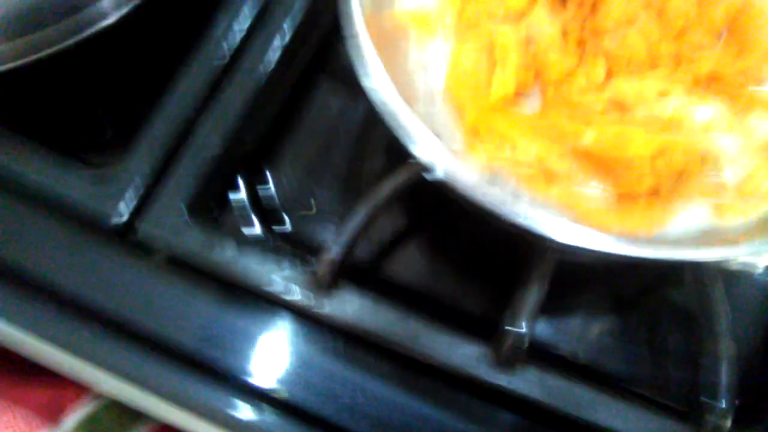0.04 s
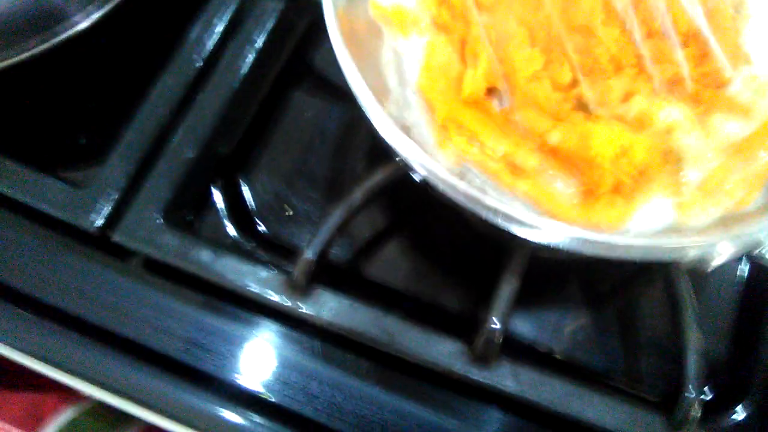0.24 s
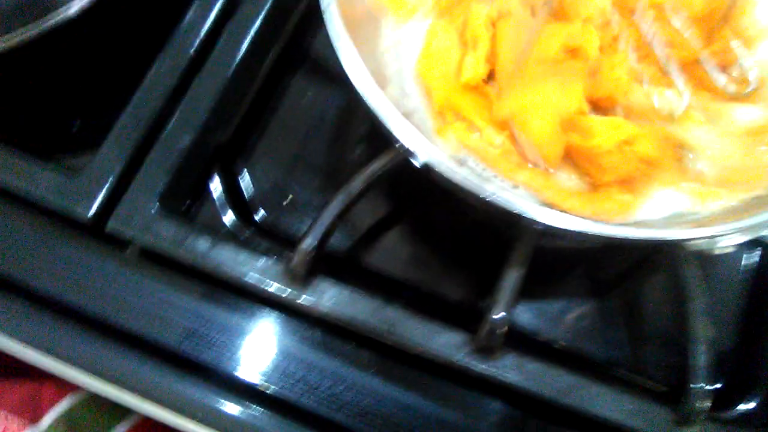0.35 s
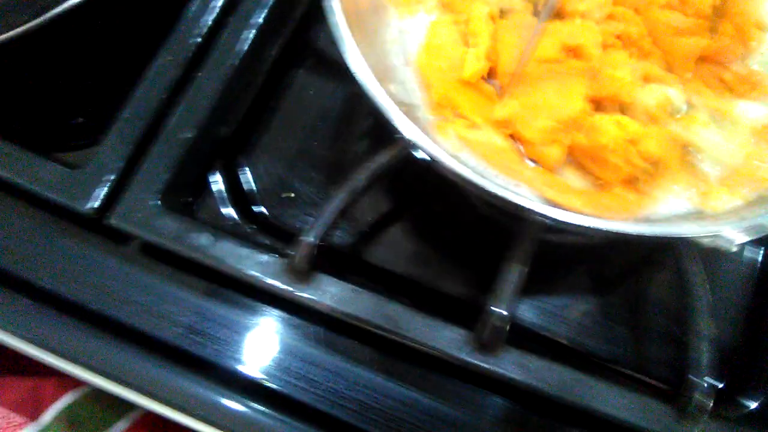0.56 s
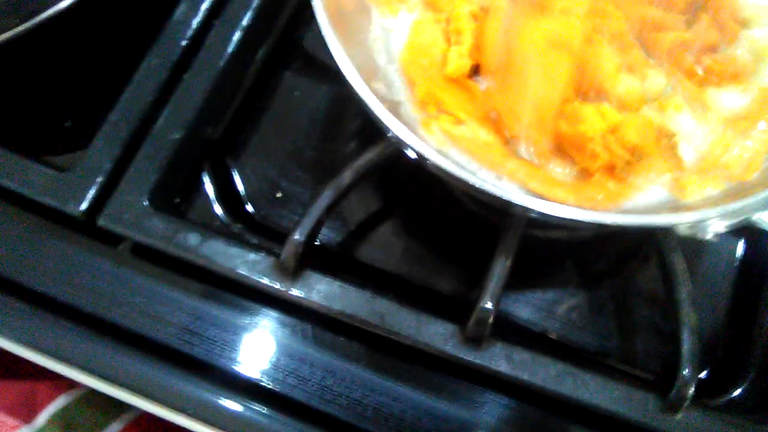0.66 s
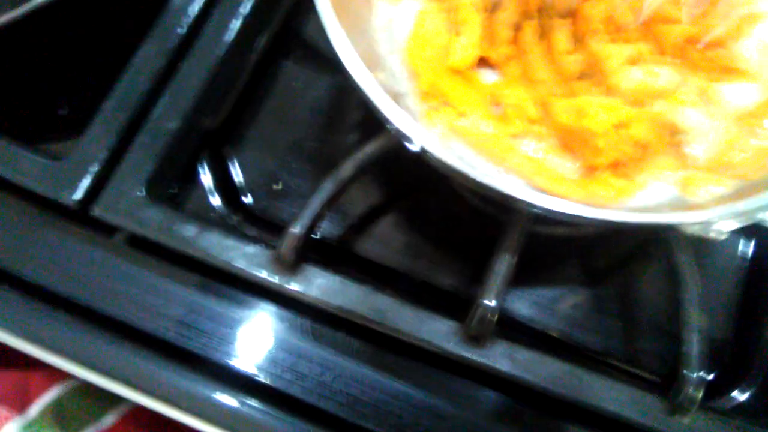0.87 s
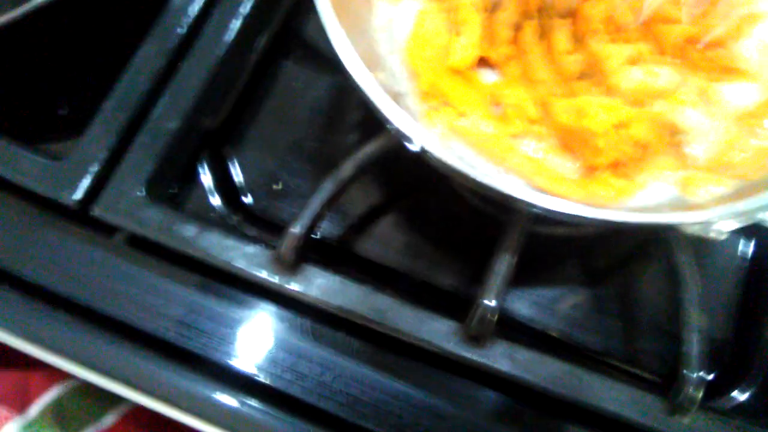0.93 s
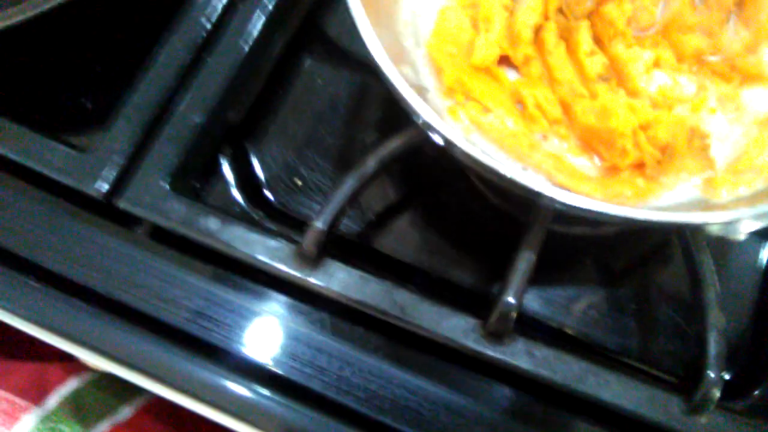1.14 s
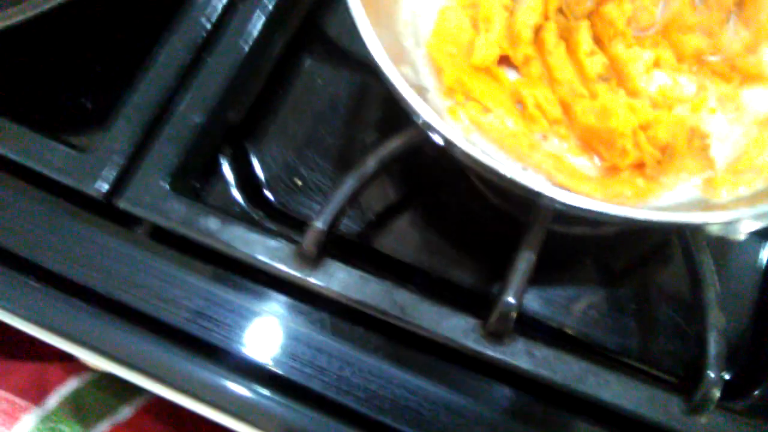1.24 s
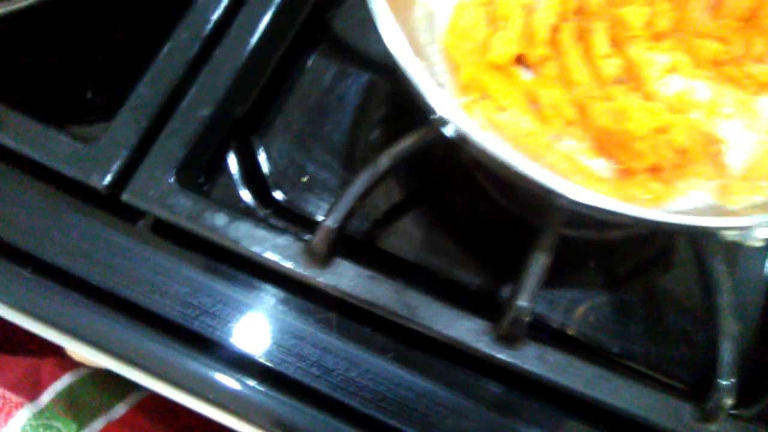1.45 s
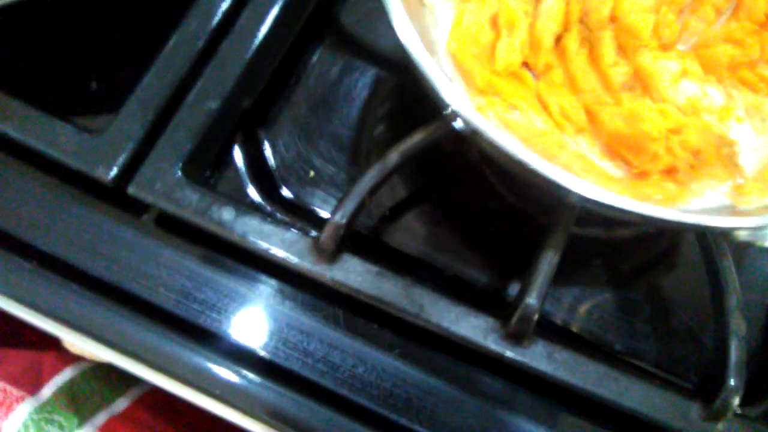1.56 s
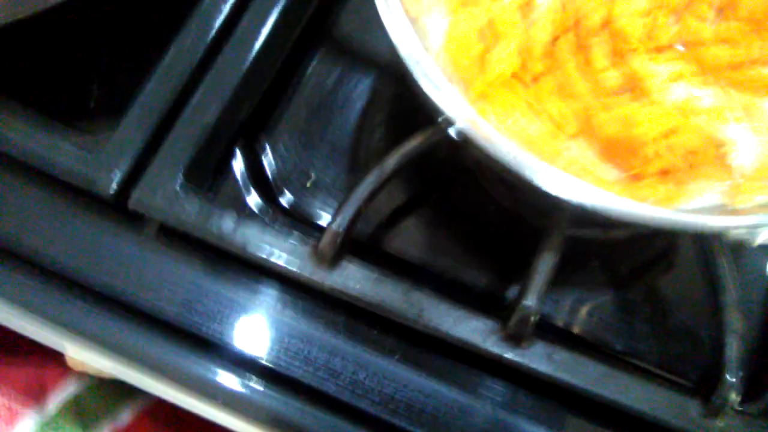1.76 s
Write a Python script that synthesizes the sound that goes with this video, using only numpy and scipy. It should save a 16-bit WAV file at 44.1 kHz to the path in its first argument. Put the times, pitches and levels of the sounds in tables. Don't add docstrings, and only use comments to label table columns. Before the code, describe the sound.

A masher knocks a metal pan full of soft mash on a stove grate, close up. Light ticks and sticky smacks open; hard clattering blows hit at 0.25-0.45 s, with low stove boom and handling jolts. Small ticks and weak knocks follow, wet smacks near 1.2 s, another clank pair at 1.27-1.3 s, then lighter knocks at 1.4, 1.55 and 1.67 s. Short kitchen tail, faint rumble.

```python
import sys
import numpy as np
from scipy import signal
from scipy.fft import rfft, irfft, next_fast_len
from scipy.io import wavfile
from scipy.ndimage import uniform_filter1d

SR = 44100
rng = np.random.default_rng(int(sys.argv[2]) if len(sys.argv) > 2 else 0)


def generate_wav(signal):
    frames = np.transpose(np.atleast_2d(signal))
    scaled = np.clip(frames, -1, 1) * 32767
    pcm = np.round(scaled).astype(np.int16)
    wavfile.write(sys.argv[1], SR, pcm)


def voltage_ratio(level):
    return 10 ** (np.asarray(level, float) / 20)


N = 79380


def curve(points, hz):
    p = np.array(points, float)
    return np.interp(np.log(np.maximum(hz, 1)), np.log(p[:, 0]), p[:, 1])


def colour(x, points, power=1):
    size = next_fast_len(x.shape[-1])
    hz = np.arange(size // 2 + 1) * SR / size
    return irfft(rfft(x, size) * voltage_ratio(power * curve(points, hz)), size)[..., :x.shape[-1]]


def ring(x, hz, t60):
    turn_and_fade = np.exp((2j * np.pi * hz - np.log(1000) / t60) / SR)
    return signal.lfilter([1], [1, -turn_and_fade], x + 0j)


def spikes(times, sizes):
    places = np.clip((np.asarray(times) * SR).astype(int), 0, N - 1)
    return np.bincount(places, sizes, N)


def walk(count):
    k = int(SR / count)
    steps = np.repeat(rng.standard_normal(N // k + 1), k)
    return 1.3 * uniform_filter1d(uniform_filter1d(steps, k), k)[:N]


def ports(z, hz):
    turn = rng.choice([-1, 1]) * min(hz / 2500, 1.6)
    return np.imag(z * np.exp(.5j * turn * np.array([[1], [-1]])))


def random_hits(times, levels_db, scatter_db):
    luck = rng.standard_normal((len(times), 2))
    sizes = voltage_ratio(levels_db + scatter_db * np.tanh(luck[:, 0]))
    return spikes(times, sizes * np.sign(luck[:, 1]))


def bursts(rows, edges_db, t60, peak_db, width, alike, under_hz):
    # (pitch [Hz], level [dB])
    crack_colour = [(240, -46.5), (400, 0), (742, -35), (1870, -11), (2430, -10), (3530, -10),
                    (4500, -10.5), (6440, -7), (13700, -29), (16000, -38.5)]
    rise_s, edge_hz, soft_edge_hz = .0007, 7000, 8400
    out, t = np.zeros((2, N + 4096)), np.arange(4096) / SR
    fade = voltage_ratio(-60 * t / t60) * np.minimum(t / rise_s, 1) ** 2
    for row, edge_db in zip(rows, edges_db):
        mid, side = rng.standard_normal((2, 4096)) * fade
        x = mid + (1 - alike) * side * np.array([[1], [-1]])
        peak = signal.lfilter(*signal.iirpeak(row[2], 1 / width, SR), x)
        x = colour(x, crack_colour) + voltage_ratio(peak_db) * peak
        x = colour(x, [(.5 * under_hz, -25), (under_hz, 0), (edge_hz, 0), (soft_edge_hz, edge_db)])
        i = int(row[0] * SR)
        out[:, i:i + 4096] += x * voltage_ratio(row[1]) / np.abs(x.mean(axis=0)).max()
    return out[:, :N]


def hum():
    # (pitch [Hz], level [dB])
    hum_colour = [(15, -19.5), (25, 26.5), (180, 7), (1290, -11), (2280, -20), (6050, -27), (14100, -30.5),
                  (14700, -64)]
    mid, side = colour(rng.standard_normal((2, N)), hum_colour)
    x = (mid + 0.26 * side * np.array([[1], [-1]])) * voltage_ratio(2 * walk(count=8))
    return x * voltage_ratio(-51) / x.std()


def room(x):
    # (pitch [Hz], t60 [s])
    room_t60 = [(200, 1), (1000, 0.24), (3000, 0.27), (8000, 0.14), (15000, 0.12)]
    t, tail = np.arange(SR // 2) / SR, 0
    for hz in 125 * 2. ** np.arange(8):
        band = signal.butter(2, [hz / 1.41, min(hz * 1.41, 20000)], "band", fs=SR, output="sos")
        noise = signal.sosfilt(band, rng.standard_normal((2, len(t))))
        tail = tail + noise * voltage_ratio(-60 * t / curve(room_t60, hz))
    tail = tail * np.minimum(t / 0.0021, 1)
    tail = tail / np.sqrt((tail ** 2).sum(axis=1).mean())
    return signal.fftconvolve(x.mean(axis=0)[None], tail)[:, :N]


def jolts():
    # (time [s], level [dB], wobble [Hz])
    hand_jolts = [
        (0, -38.5, 46.4),
        (0.256, -25, 32.7),
        (0.432, -28.5, 30.24),
        (.99, -38.5, 48.3),
        (1.289, -40.5, 52),
    ]
    out = 0
    for s, db, hz in hand_jolts:
        out = out + np.imag(ring(spikes([s], [voltage_ratio(db)]), hz, 0.45)) * voltage_ratio(2.5 * walk(count=15))
    return uniform_filter1d(out, size=301)


def smacks():
    # (time [s], peak level [dB], colour [Hz])
    mash = [(.0134, -35, 5600), (.0850, -20.5, 6570), (.0440, -26, 5300), (.1218, -34, 5400),
            (.6195, -37.5, 6500), (.6245, -31.5, 7870), (.6295, -26, 6600), (.6340, -42, 7240),
            (.6425, -24, 5580), (.9780, -36, 6500), (1.0973, -40, 6300), (1.1010, -43.5, 7020),
            (1.1450, -40.5, 6300), (1.1580, -42, 6500), (1.1875, -18.5, 6470), (1.2017, -18.5, 6700),
            (1.5172, -41, 8700), (1.5395, -33, 4550), (1.6194, -34, 6060), (1.7651, -30.5, 9050),
            (.9545, -53, 7500), (.9622, -23.5, 6300), (.9967, -25, 6230), (1.1290, -51, 8000),
            (1.1750, -45, 4800), (1.4780, -32, 5050), (1.4825, -43, 7500), (1.4925, -34.5, 5900),
            (1.5025, -51, 7040), (1.5805, -48, 9000), (1.7267, -31, 4900), (1.7770, -42, 6000),
            (1.7846, -37, 5500), (1.7985, -26, 8140)]
    return bursts(mash, np.full(len(mash), -4.), t60=.009, peak_db=24.0, width=0.26, alike=0.28,
                  under_hz=3704)


def grate():
    # (time [s], peak level [dB], pitch [Hz])
    ticks = [(0.0436, -14, 2603), (0.2272, -36.5, 2560), (0.2886, -11, 1880), (.2940, -9, 2500),
             (.3010, -18, 2670), (.3770, -16.5, 1790), (.0880, -28, 3000), (.5460, -22, 3750),
             (0.6558, -16.5, 2950), (1.3135, -14.5, 2370), (.4115, -26, 2410), (0.6279, -22.5, 2560),
             (0.7093, -24, 2250), (.7836, -25, 2280), (.8425, -31, 2170), (0.8868, -40, 2000),
             (1.1742, -18.5, 2370), (1.1954, -29, 1950), (1.3884, -26, 2280), (1.7267, -20.5, 2410)]
    t60_s, rise_s, glide = .012, .0015, .16
    out, t = np.zeros((2, N + 2048)), np.arange(2048) / SR
    bend = 2 * np.pi * np.cumsum(1 + glide * (np.minimum(t / 0.0028, 1) - .5)) / SR
    rise = np.sin(np.minimum(t / rise_s, 1) * np.pi / 2) ** 2
    for s, db, hz in ticks:
        chirp = np.exp(1j * hz * bend) + voltage_ratio(-19.5) * np.exp(1.7j * hz * bend)
        i = int(s * SR)
        out[:, i:i + 2048] += ports(chirp * voltage_ratio(db - 60 * t / t60_s) * rise, hz)
    k = np.array(ticks)
    hits = uniform_filter1d(spikes(k[:, 0] + 0.00091, voltage_ratio(k[:, 1])), size=9) * 8
    bars = 0
    for hz, db, t60 in [(2020, -46, 0.2), (2370, -45.5, 0.096)]:
        bars = bars + voltage_ratio(db) * ports(ring(hits, hz, t60) * np.exp(.7j * walk(count=50)), hz)
    return (out[:, :N] + bars) * voltage_ratio(np.array([[1], [-1]]))


def stove(rattle):
    # (time [s], level [dB], where it booms [Hz])
    thuds = [(0.010, -31.5, 120), (0.047, -30.5, 161), (.248, -18.5, 222), (0.287, -20.5, 198),
             (0.323, -37.5, 280), (.429, -25.5, 180), (0.506, -37.5, 162), (.545, -31, 246),
             (.60, -36.5, 151), (0.656, -37.5, 200), (0.714, -35, 178), (0.786, -44, 170),
             (0.859, -48, 190), (0.965, -34, 300), (0.995, -39.5, 280), (1.177, -37.5, 150),
             (1.269, -28.5, 302), (1.299, -28.5, 200), (1.407, -36.5, 180), (1.474, -36, 174),
             (1.55, -30, 300), (1.667, -37, 180), (1.728, -34.5, 165)]
    # (pitch [Hz], level [dB], t60 [s])
    body_notes = [(87.5, -8, 0.17), (108.6, -10, .22), (166.5, -3.5, 0.28), (191.5, -8.5, 0.21),
                  (256.5, -9, 0.18), (292.5, -4, 0.16), (330, -10, 0.22), (404.4, -16.5, 0.29),
                  (489, -14, 0.2), (726, -21.5, 0.19)]
    wobble, reach_oct, rattle_db = .95, 0.9, -30
    k, out = np.array(thuds), 0
    for hz, db, t60 in body_notes:
        near_db = -6 * (np.log2(hz / k[:, 2]) / reach_oct) ** 2
        hits = random_hits(k[:, 0], k[:, 1] + near_db, scatter_db=1.3)
        waver = np.exp(wobble * (0.098 * walk(count=30) + 1j * walk(count=30)))
        out = out + voltage_ratio(db) * ports(ring(hits + voltage_ratio(rattle_db) * rattle, hz, t60) * waver, hz)
    return uniform_filter1d(out, size=31)


def chatter():
    starts = [0, .251, .290, .432, .628, .965, 1.177, 1.275, 1.300, 1.405, 1.549, 1.730]
    # (length [s], level [dB], level change by the end [dB])
    spells = [(.13, -50.5, -4), (0.034, -23, -1), (0.17, -20, -30), (0.2, -35.5, -28.5), (0.16, -43, -24.5),
              (0.058, -38.5, -26), (0.043, -43.5, -10), (0.045, -27.5, -8.5), (0.089, -29.5, -19.5),
              (0.45, -49.5, -45), (0.23, -50, -30), (0.06, -48.5, -13.5)]
    per_s, spread_db = 2500, 2.6
    t, gain = np.arange(N) / SR, np.zeros(N)
    for start, (length, db, fade_db) in zip(starts, spells):
        u = (t - start) / length
        gain += voltage_ratio(db + fade_db * np.clip(u, 0, 1)) * (u >= 0) * (u < 1)
    chance = rng.random((3, N))
    knock = (chance[0] < per_s / SR) * np.sign(chance[1] - .5)
    size = voltage_ratio(spread_db * np.minimum(-np.log(chance[2]), 5))
    return gain * knock * size * 4


def free_pan():
    # (time [s], level [dB])
    lifts = [
        (.0442, -47.5),
        (1.1745, -51.5),
        (1.726, -51.5),
    ]
    # (pitch [Hz], level [dB], t60 [s])
    free_notes = [(802, -1, .8), (5100, 13, .08), (6200, 6, .06)]
    k, out = np.array(lifts), 0
    hits = spikes(k[:, 0], voltage_ratio(k[:, 1]))
    for hz, db, t60 in free_notes:
        note = ports(ring(hits, hz, t60) * np.exp(.7j * walk(count=40)), hz)
        out = out + voltage_ratio(db) * note * voltage_ratio(1.9 * walk(count=30))
    return out


def notes():
    # (time [s], level [dB], pitch [Hz], t60 [s])
    left_singing = [(.4283, -17, 1260, 0.032), (.4360, -24.5, 1865, 0.078), (.6553, -34, 1640, 0.11),
                    (.6556, -37, 4700, 0.072), (.6556, -39.5, 5940, .11), (.7225, -39, 1665, 0.065),
                    (.9680, -40.5, 1720, .14), (1.4051, -39, 1820, 0.063), (1.4051, -39, 3040, 0.11),
                    (1.6650, -38.5, 1865, 0.11), (1.2984, -22, 1122, 0.035), (1.5456, -19, 5360, 0.021),
                    (1.544, -25.5, 1062, 0.027)]
    out = 0
    for s, db, hz, t60 in left_singing:
        note = ring(spikes([s], [voltage_ratio(db)]), hz, min(t60, .13))
        out = out + ports(note * np.exp(1.1j * walk(count=150)), hz / 3)
    return out


def pan(rattle):
    # (time [s], peak level [dB], colour [Hz], bright edge [dB])
    blows = [(0.2468, -2.5, 1754, -1), (0.2492, -11.5, 3900, 5), (0.2579, -20, 2650, -10),
             (0.282, -11, 6560, 0), (0.3289, -12.5, 6100, -12), (0.336, -14.5, 5800, -9),
             (0.4433, -14, 1870, -23), (0.2882, -10.5, 2080, -2.5), (0.2999, -8, 3000, -11),
             (0.3218, -8, 5940, -2.5), (0.3585, -18, 6000, -19), (0.4284, -6, 3060, 4.5),
             (0.4278, -8, 1375, -3), (0.4353, -12, 1800, -14.5), (0.5456, -31, 3740, -25),
             (0.6553, -23, 1490, -38.5), (0.722, -40.5, 1614, -52), (0.9620, -27, 4350, -15),
             (0.967, -26.5, 1660, -12.5), (0.9974, -27.5, 2860, 5), (1.2678, -10.5, 1930, 6),
             (1.2721, -8, 4850, -5), (1.2973, -9, 1070, -1), (1.3285, -20.5, 6400, -9),
             (1.4039, -25.5, 1790, -13), (1.4675, -27.5, 3900, -10.5), (1.5453, -15, 4610, 3.5),
             (1.6652, -20.5, 1910, -7.5)]
    # (pitch [Hz], level [dB], t60 [s])
    pan_notes = [(953.4, -3, 0.045), (1172, -2.5, 0.04), (1803, 1.5, 0.015), (2146, -14.5, 0.077),
                 (2855, -10, 0.13), (3000, -8, 0.077), (3333, -5.5, 0.058), (4170, -18, 0.041),
                 (5220, 0.5, 0.05), (6020, -2, 0.1), (6500, -11, .07)]
    # (pitch [Hz], level [dB])
    scrape_colour = [(240, -37.5), (400, 2), (900, 0.5), (2000, 3.5), (3200, 5), (4500, 5.5), (6100, 2.5),
                     (8000, -7.5), (13300, -27), (16000, -62.5)]
    ring_db, scatter_db, reach_oct = -12.5, 5, .9
    k = np.array(blows)
    out = bursts(blows, k[:, 3], t60=0.023, peak_db=-2.0, width=0.075, alike=0.25, under_hz=550)
    smear = rng.standard_normal((2, 256)) * voltage_ratio(-60 * np.arange(256) / SR / 0.014) * 0.22
    out = out + colour(signal.fftconvolve(rattle[None], smear)[:, :N], scrape_colour)
    for hz, db, t60 in pan_notes:
        near_db = -6 * (np.log2(hz / k[:, 2]) / reach_oct) ** 2
        hits = random_hits(k[:, 0], k[:, 1] + near_db, scatter_db)
        note = ring(hits + voltage_ratio(-22.0) * rattle, hz, min(t60, .12))
        out = out + voltage_ratio(ring_db + db) * ports(note * np.exp(1j * walk(count=80)), hz)
    return out


def scene():
    rattle = chatter()
    near = pan(rattle) + grate() + smacks() + free_pan() + notes()
    return near + voltage_ratio(-10) * room(near) + stove(rattle) + jolts() + hum()


def roll_off(x):
    return signal.sosfilt(signal.butter(12, 16460, fs=SR, output="sos"), x)


def record(dry):
    # (pitch [Hz], left minus right [dB])
    left_minus_right = [(60, -3.5), (110, 1.5), (200, -3), (380, 0), (700, -1.5), (1290, -4), (2380, -7.5),
                        (4400, 4), (8120, 1), (15000, -12)]
    left = colour(dry[0], left_minus_right, power=0.55)
    right = colour(dry[1], left_minus_right, power=-0.74)
    mix = colour(np.array([left, right]), [(13900, 0), (14700, -10), (16400, -30)])
    return roll_off(mix)


dry = scene()
out = record(dry)
generate_wav(out)
```